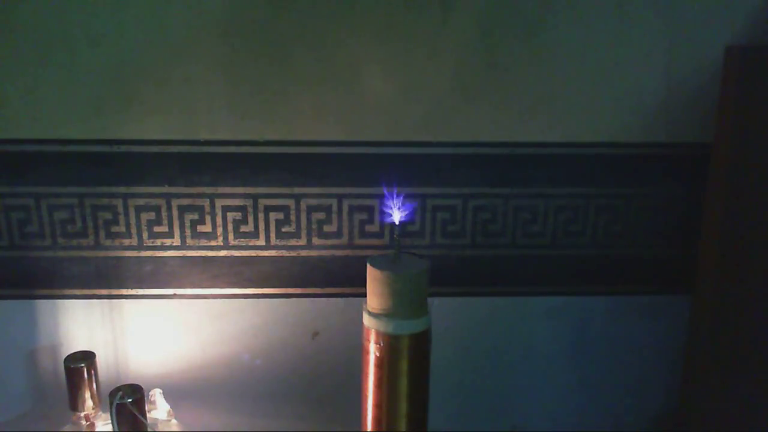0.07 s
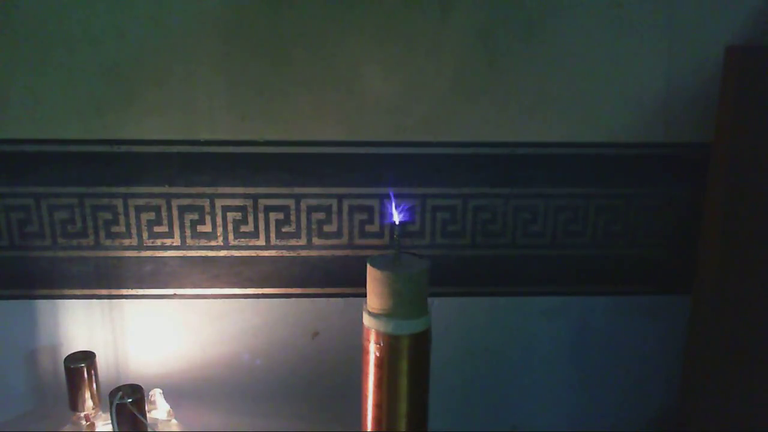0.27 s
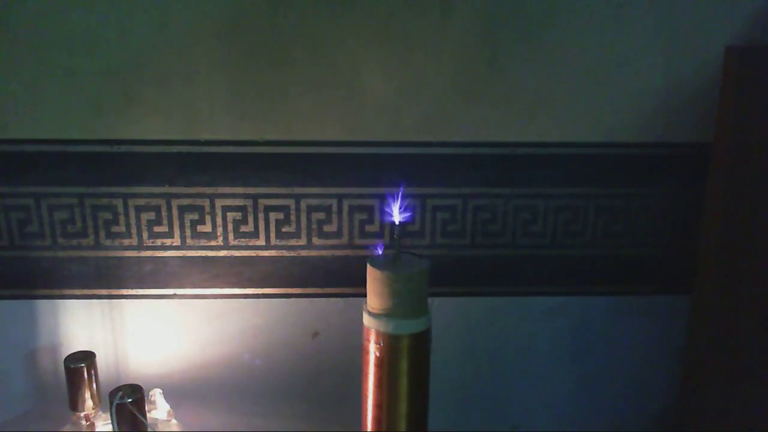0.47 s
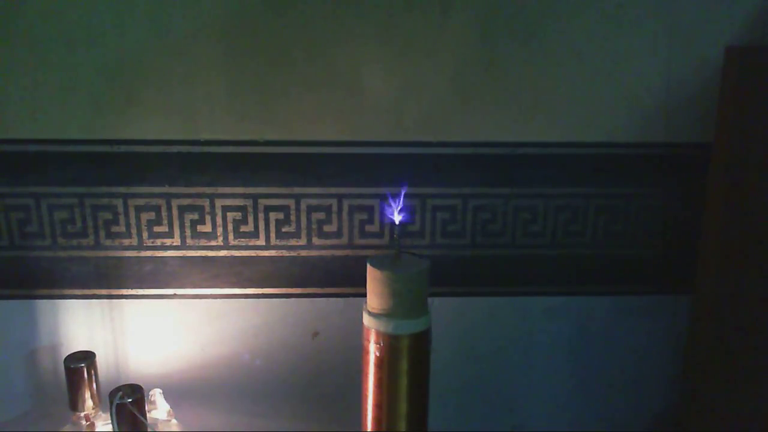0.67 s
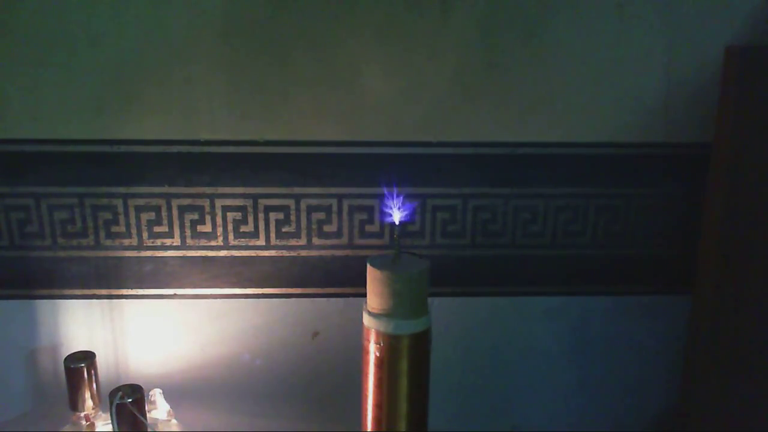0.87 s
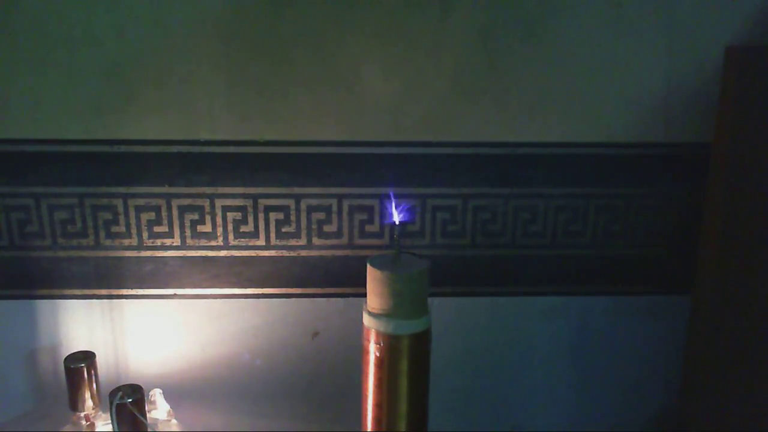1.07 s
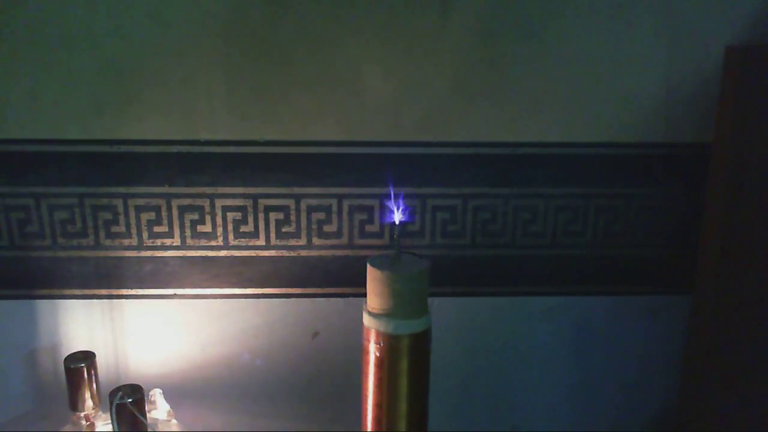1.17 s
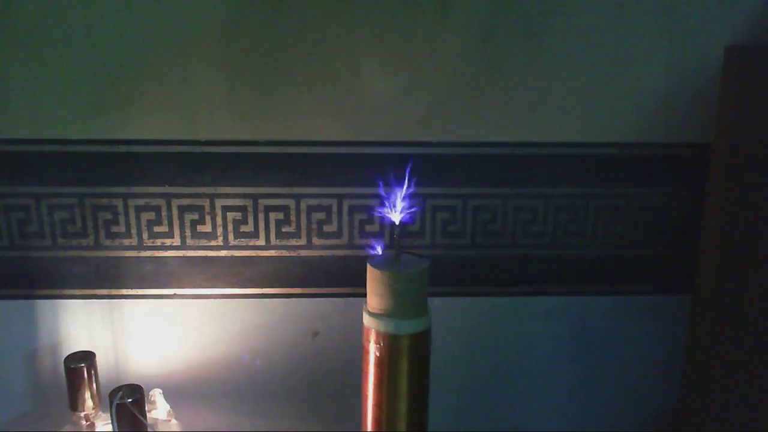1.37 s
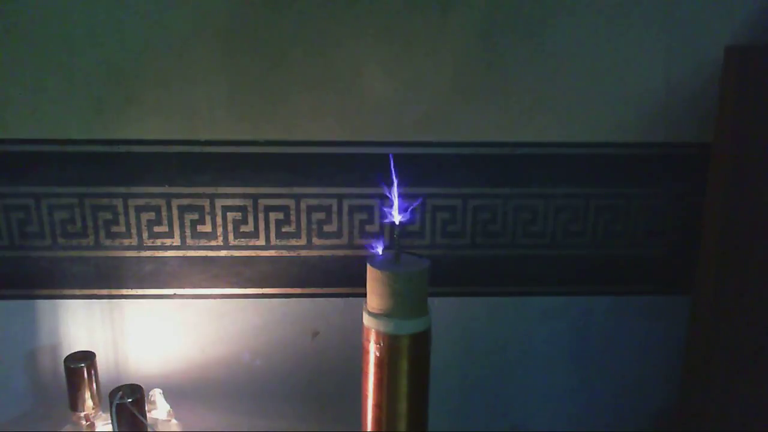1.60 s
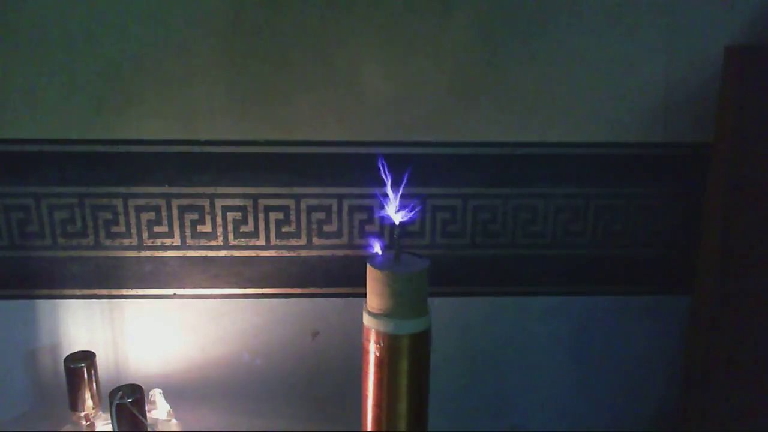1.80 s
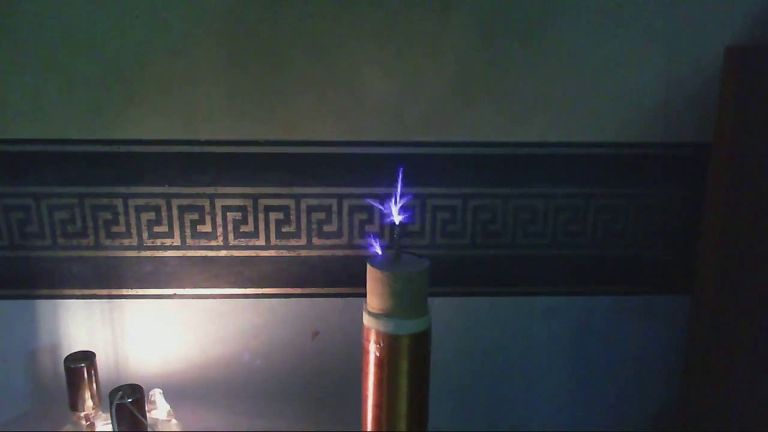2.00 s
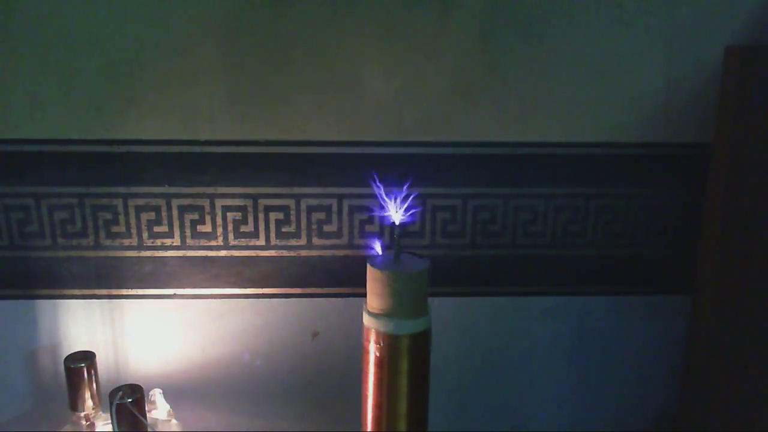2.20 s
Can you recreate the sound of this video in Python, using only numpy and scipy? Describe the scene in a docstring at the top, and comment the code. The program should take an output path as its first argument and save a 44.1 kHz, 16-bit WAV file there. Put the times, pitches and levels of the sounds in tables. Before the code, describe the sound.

A high-voltage coil buzzes with hissing sparks, clicks once, then runs on louder.

```python
"""A home-built high-voltage coil buzzes in a small room. Once a mains cycle its streamers flare:
a low push of hum and a burst of hissing, crackling sparks. The coil drops out for a moment,
a switch snaps over and rings its loose box, and the coil runs on, louder, at higher power.
Sparks and switch echo briefly in the room, over a faint noise floor."""
import sys
import numpy as np
from scipy import signal
from scipy.fft import rfft, irfft, next_fast_len
from scipy.io import wavfile
from scipy.ndimage import map_coordinates

SR = 44100
rng = np.random.default_rng(int(sys.argv[2]) if len(sys.argv) > 2 else 0)


def waveform_to_disk(signal):
    """Save audio, clipped to [-1, 1], as 16-bit WAV at the path in sys.argv[1]."""
    frames = np.transpose(np.atleast_2d(signal))
    scaled = np.clip(frames, -1, 1) * 32767
    samples = np.round(scaled).astype(np.int16)
    wavfile.write(sys.argv[1], SR, samples)


N = 99136

MAINS_HZ = 49.88
# The coil's two runs, low power then high:
# (on [s], off [s], time of one flare [s], hiss level [dB], crackle level [dB])
COIL_RUNS = [(-.1, 1.1368, .0168, -43, -46), (1.171, 2.4, 1.2016, -39.5, -44)]


def amp(db):
    """Decibels to gain."""
    return 10 ** (np.asarray(db) / 20)


def unit(x):
    """Scale to rms 1."""
    return x / np.sqrt(np.mean(x ** 2) + 1e-20)


def along(points, hz):
    """Read a curve of (frequency, value) points on a log frequency axis."""
    freqs, values = np.transpose(points)
    return np.interp(np.log(hz + 1), np.log(freqs + 1), values)


def wobble(per_s):
    """A smooth random curve with per_s knots a second."""
    knots = rng.standard_normal(int(N * per_s / SR) + 4)
    return map_coordinates(knots, [np.arange(N) * per_s / SR])


def filtered(x, response):
    """Filter x by a gain given as a function of frequency."""
    size = next_fast_len(N + SR // 2)
    return irfft(rfft(x, size) * response(np.fft.rfftfreq(size, 1 / SR)), size)[:N]


def coloured(x, eq):
    """x through an EQ curve, at rms 1."""
    return unit(filtered(x, lambda hz: amp(along(eq, hz))))


def noise(eq):
    """Coloured noise of rms 1."""
    return coloured(rng.standard_normal(N), eq)


def powered(t, on, off, rise_s, stop_s=0.00022):
    """The coil's gate: it builds up, but cuts out at once."""
    return np.clip((t - on) / rise_s, 0, 1) * np.clip((off - t) / stop_s, 0, 1)


def hum(t):
    """One push of air a mains cycle; the upper partials waver more and build up more slowly."""
    # Hum partials: (multiple of the mains, level at low power [dB], level at high power [dB])
    partials = [(1, -31.8, -29.7), (2, -31, -26.4), (3, -39.8, -35.6), (4, -54.5, -51), (5, -51, -43),
                (6, -51.5, -47), (7, -65, -60), (8, -60.5, -49), (9, -61, -55), (10, -61, -59),
                (11, -64, -60.5), (12, -70, -60), (14, -65, -59.5)]
    sag_db_per_s = 0.5  # the hum sinks slowly, at low power only
    out = np.zeros(N)
    for run, (on, off, flare_s, *_) in enumerate(COIL_RUNS):
        sag = amp(-sag_db_per_s * (t - off / 2)) if run == 0 else 1
        for k, *levels in partials:
            waver = 0.0073 * k ** 1.8 * (wobble(14) + 1j * wobble(14.13))  # in level and phase
            phase = 2 * np.pi * k * MAINS_HZ * (t - flare_s)
            partial = unit(np.imag((1 + waver) * np.exp(-1j * phase)))
            out += amp(levels[run]) * partial * sag * powered(t, on, off, rise_s=k * 0.0072)
    return out


def flares(cycles, stretch, rise_s=0.002, fall_s=0.0032):
    """One swell a mains cycle, quick to rise and slower to fall, each of its own size."""
    nearest = np.round(cycles).astype(int)
    sizes = amp(rng.normal(0, 1.3, 256))
    age = (cycles - nearest) / MAINS_HZ
    width = stretch * np.where(age < 0, rise_s, fall_s)
    return sizes[nearest % len(sizes)] * np.exp(-.5 * (age / width) ** 2)


def streamers(t):
    """The discharge: hiss, single spark cracks and a low flutter, all swelling with each flare."""
    # Tone of the hiss, the cracks and the flutter, each: (frequency [Hz], relative level [dB])
    hiss_eq = [(150, -39), (400, 0.5), (800, -2.5), (1500, -8.5), (2500, -8), (3500, -6), (5000, -3.5),
               (6500, -2), (8500, 0.5), (10000, -0.5), (12000, -4.5), (15500, -7.5)]
    crackle_eq = [(150, 15), (400, 2), (850, 2.5), (1200, 2.5), (1700, 3), (2400, 4), (3400, -2.5),
                  (4800, -0.5), (6500, -9.5), (9000, -4), (12000, -11.5), (15500, -8)]
    flutter_eq = [(25, 12), (60, 7), (130, 0.5), (240, -3), (400, -2), (600, -10), (1200, -16), (4000, -56)]
    sparks_per_s, flutter_db = 6000, -50.5
    lag_s = 0.0007  # sparks peak just after the hum's push
    out = np.zeros(N)
    for on, off, flare_s, hiss_db, crackle_db in COIL_RUNS:
        cycles = (t - flare_s - lag_s) * MAINS_HZ
        main_flare = flares(cycles, stretch=0.97)
        back_flare = amp(-3) * flares(cycles + .5, stretch=1)  # the opposite half cycle
        steady_glow = amp(-5)
        swell = unit(np.sqrt(main_flare ** 2 + back_flare ** 2 + steady_glow ** 2))
        hiss = amp(hiss_db) * swell * noise(hiss_eq) * amp(0.39 * wobble(11.92))
        strikes = rng.random(N) < sparks_per_s / SR
        cracks = strikes * amp(rng.normal(0, 1.5, N)) * rng.choice([-1, 1], N)
        cracks *= flares(cycles, stretch=0.94)  # tighter round the peak than the hiss
        crackle = amp(crackle_db) * coloured(cracks, crackle_eq)
        flutter = amp(flutter_db) * swell * noise(flutter_eq)
        out += powered(t, on, off, rise_s=0.0059) * (hiss + crackle + flutter)
    return out


def surroundings(hz):
    """Response round the coil: the direct path plus narrow resonances that the sparks ring."""
    # Resonances near the coil: (centre [Hz], width [Hz], relative level [dB])
    resonances = [(379, 11, 7.5), (839, 30, 4.5), (1450, 17, -5.5), (1630, 29, 0), (2164, 44, -7.5),
                  (2520, 95, -3), (4680, 53, -3.5), (5530, 90, -3), (6700, 58, -8)]
    ringing = sum(amp(db) * 1j * hz * width / (centre ** 2 - hz ** 2 + 1j * hz * width)
                  for centre, width, db in resonances)
    return 1 + amp(-5) * ringing


def room(x):
    """The small room's reverb: the treble dies first."""
    # Decay of the room: (frequency [Hz], t60 [s])
    decay = [(200, 0.35), (2000, 0.29), (7000, 0.17), (15000, 0.1)]
    hz, age, spectra = signal.stft(rng.standard_normal(SR // 2), SR, nperseg=256)
    fade = amp(-60 * age / along(decay, hz)[:, None])
    tail = signal.istft(spectra * fade, SR, nperseg=256)[1]
    impulse = np.pad(tail, (SR // 400, 0)) / np.linalg.norm(tail)  # 2.5 ms pre-delay
    return signal.fftconvolve(x, impulse)[:N]


def wandering_echo(x, t, paths):
    """The streamers keep moving, so each cycle reaches the room by a path picked at random."""
    path = rng.integers(paths, size=256)[(t * MAINS_HZ).astype(int)]
    return sum(room(x * (path == k)) for k in range(paths))


def room_tone():
    """A faint, steady noise floor, mostly rumble."""
    # Tone of the floor: (frequency [Hz], relative level [dB])
    floor_eq = [(25, 9), (120, 9), (400, -17), (1500, -6), (8000, -26), (15000, -47)]
    return amp(-52) * noise(floor_eq)


def switch(t):
    """A tiny tick at first touch, then the contacts snap home and ring the loose box."""
    # Hits of the contacts: (time [s], level [dB])
    contacts = [(1.1676, -17), (1.1712, -16), (1.1788, -32.5)]
    # Modes of the switch and its box: (frequency [Hz], relative level [dB], t60 [s])
    modes = [(680, -11, 0.096), (1073, -12, 0.082), (1580, -10.5, 0.095), (2207, -12.5, 0.14),
             (2470, -9, 0.085), (2570, -4.5, 0.037), (2860, -16, 0.047), (3223, -9.5, .1),
             (3610, -11.5, 0.092), (4030, -12.5, 0.085), (7020, 0, .04), (7480, -7, 0.051),
             (7765, -7, 0.045), (8460, -20, 0.038)]
    # Tone of the snap: (frequency [Hz], relative level [dB])
    snap_eq = [(150, 1.5), (500, 5.5), (1800, -4), (2500, 8.5), (4200, -2.5), (6200, -1), (7400, 5.5),
               (9500, 0), (11500, -9), (15500, -17)]
    tick_s, tick_t60_s = 1.1639, 0.0024
    attack_s, snap_t60_s = 0.00057, 0.054
    tick_envelope = amp(-24.5 - 60 * np.abs(t - tick_s) / tick_t60_s) * (t > tick_s)
    out = tick_envelope * rng.standard_normal(N)
    for hit_s, hit_db in contacts:
        age = np.maximum(t - hit_s, 0)
        rattle_rad = 0.68 * wobble(350)  # the loose box smears the phase of its ring
        ring = sum(amp(db - 60 * age / t60) * np.sin(2 * np.pi * (hz * age + rng.random()) + rattle_rad)
                   for hz, db, t60 in modes)
        snap = amp(-0.5 - 60 * age / snap_t60_s) * noise(snap_eq)
        attack = 1 - np.exp(-age / attack_s)
        out += amp(hit_db) * attack * (amp(-6.5) * ring + snap)
    return out


def scene():
    """Mono mix: dry hum, sparks and switch with their reverb, and room tone."""
    t = np.arange(N) / SR
    sparks = filtered(streamers(t), surroundings)
    click = switch(t)
    reverb = amp(-4.5) * wandering_echo(sparks, t, paths=4) + amp(-4) * room(click)
    return (hum(t) + sparks + click + reverb + room_tone())[None]


def record(dry):
    """A brick-wall low-pass takes off the very top."""
    return filtered(dry[0], lambda hz: hz < 15850)[None]


dry = scene()
out = record(dry)
waveform_to_disk(out)
```